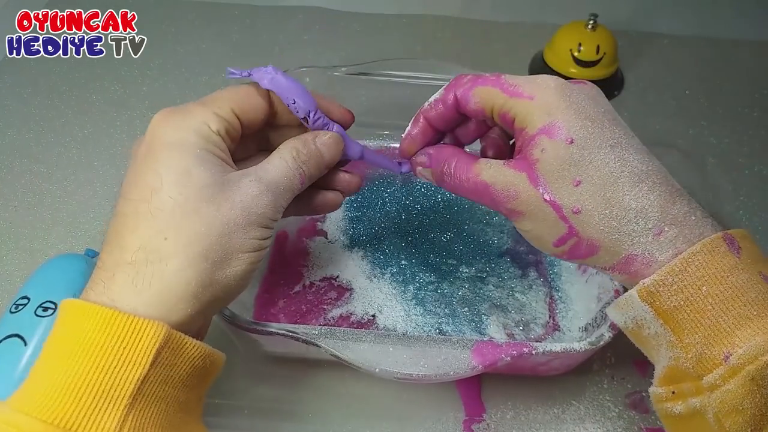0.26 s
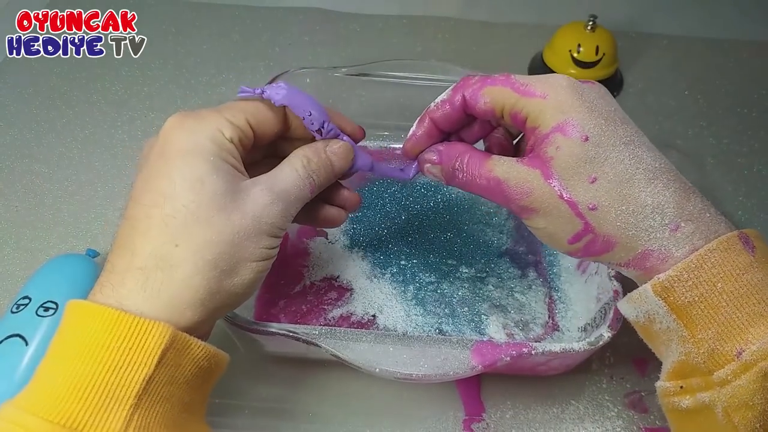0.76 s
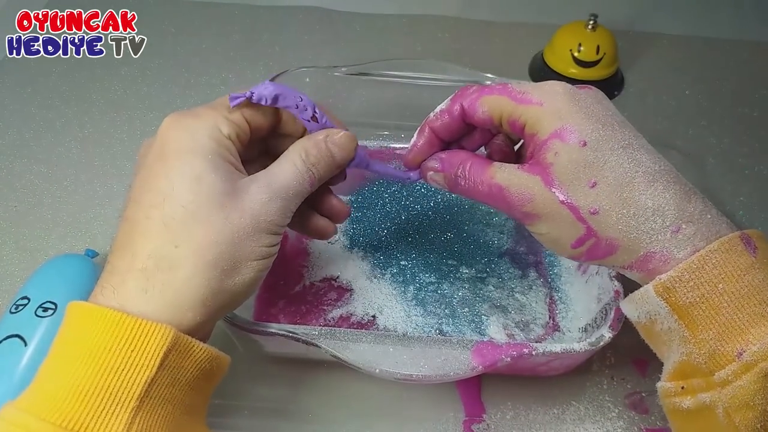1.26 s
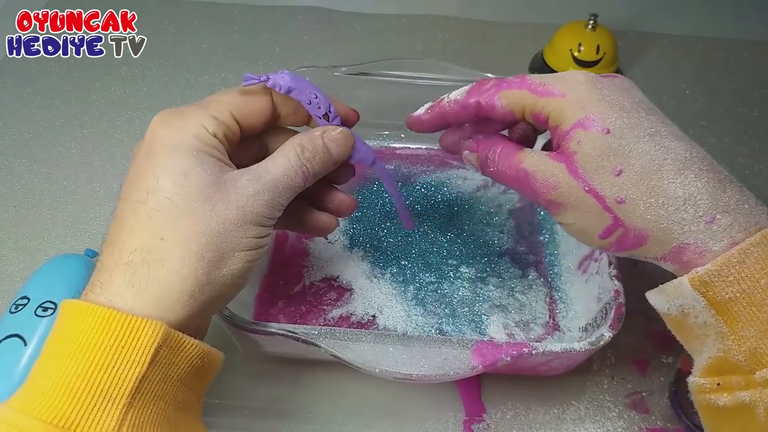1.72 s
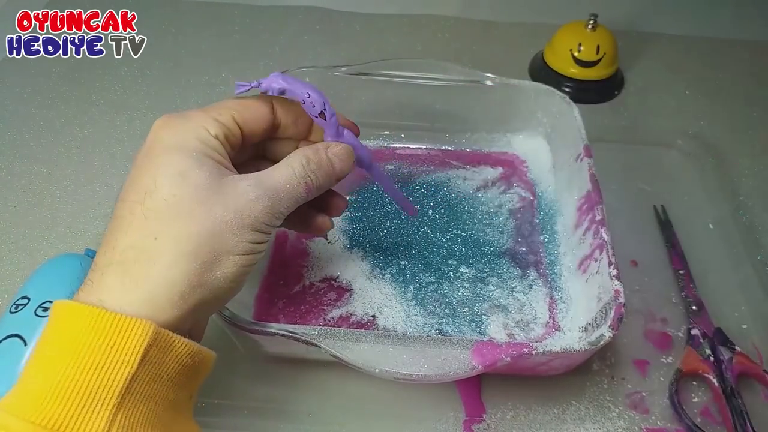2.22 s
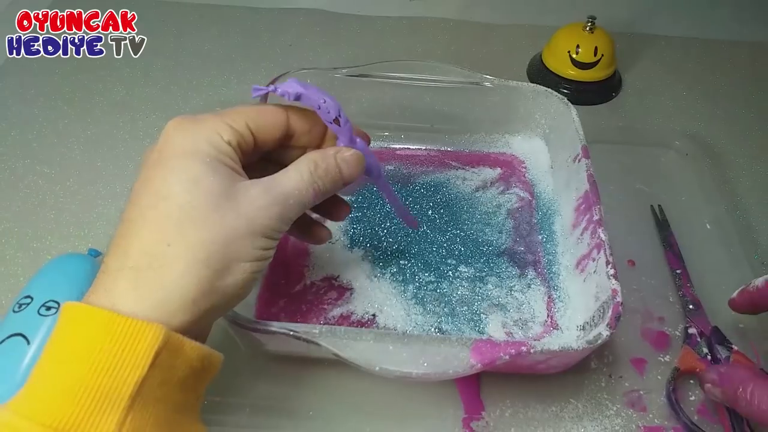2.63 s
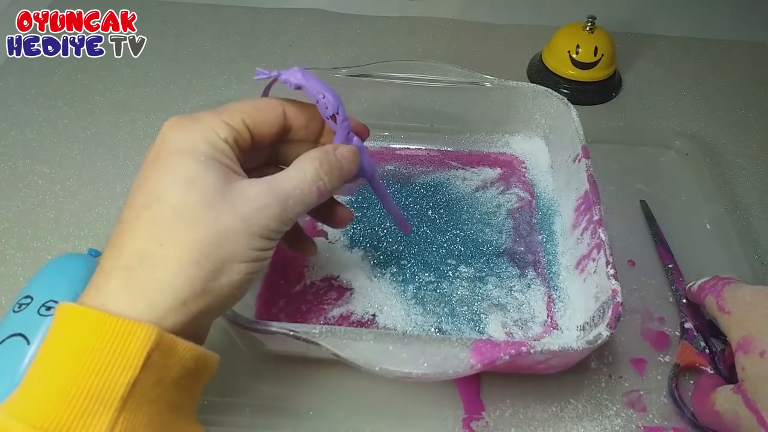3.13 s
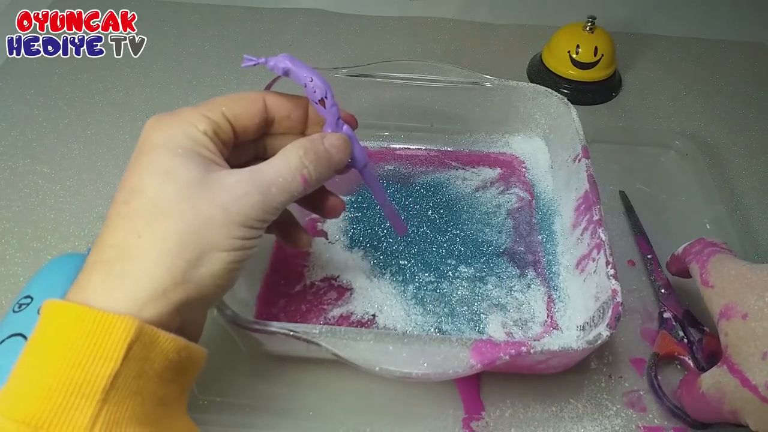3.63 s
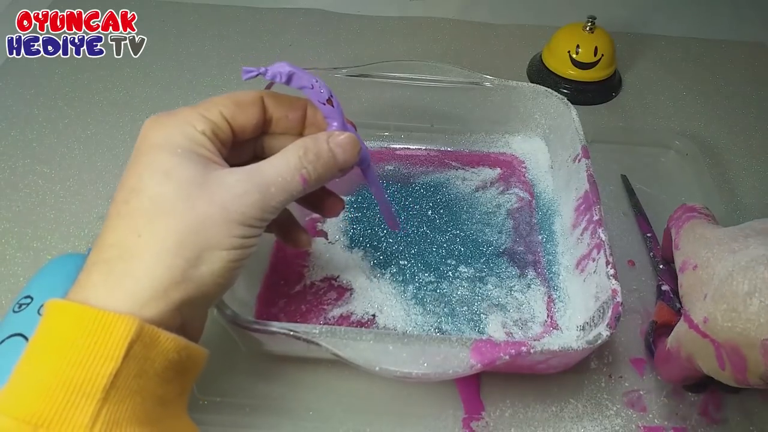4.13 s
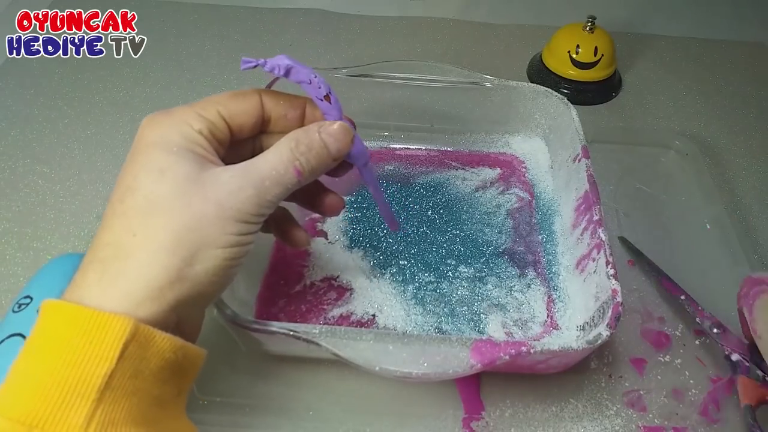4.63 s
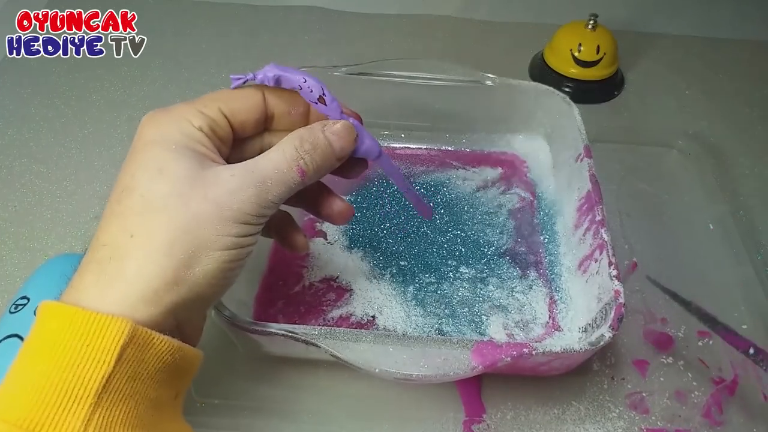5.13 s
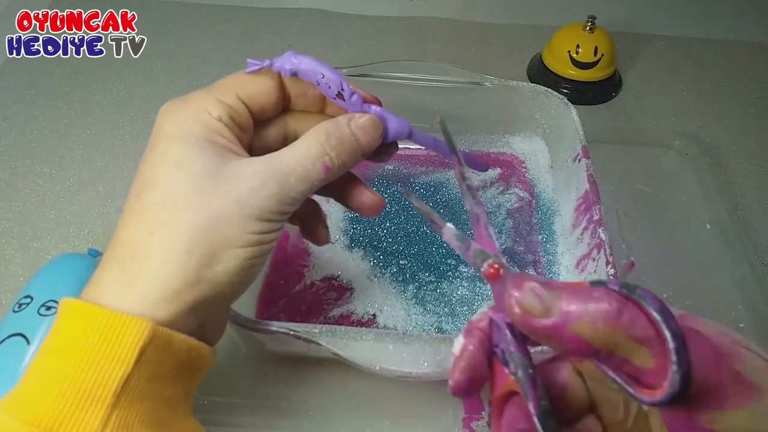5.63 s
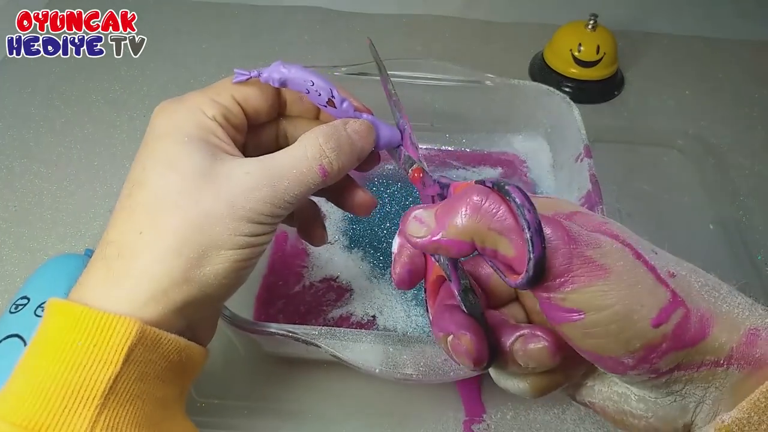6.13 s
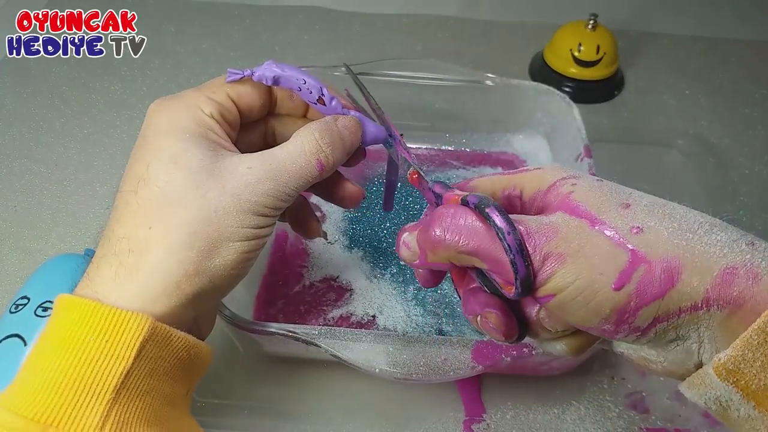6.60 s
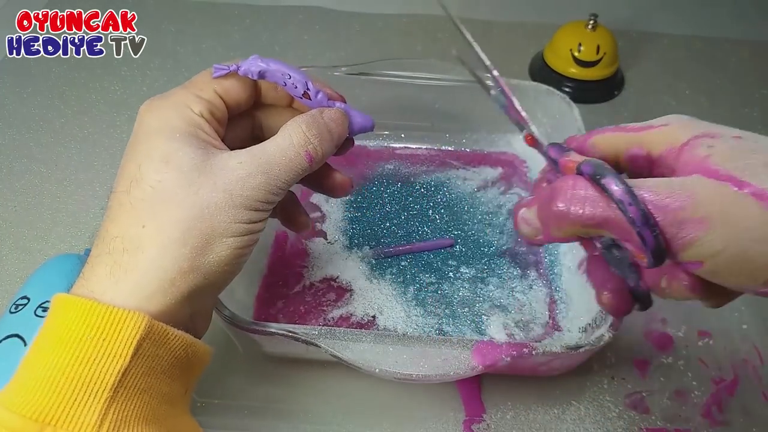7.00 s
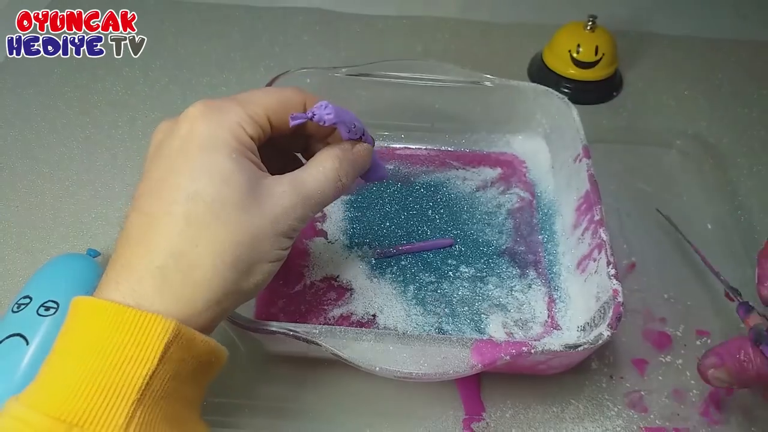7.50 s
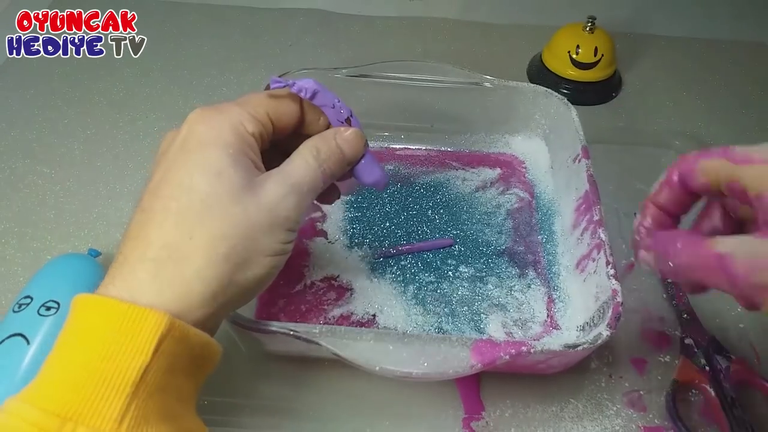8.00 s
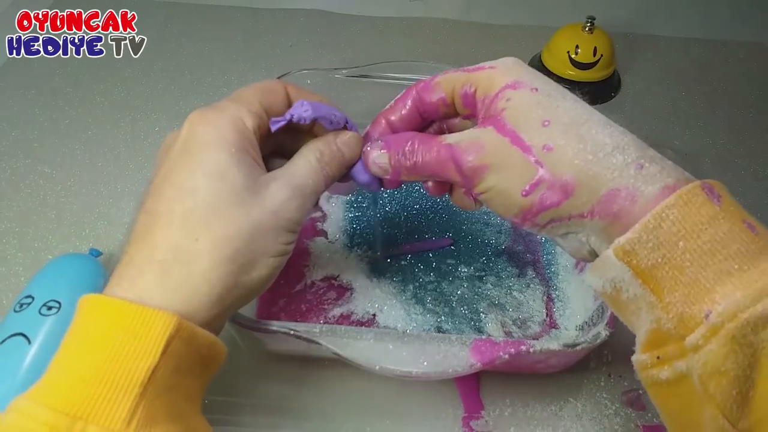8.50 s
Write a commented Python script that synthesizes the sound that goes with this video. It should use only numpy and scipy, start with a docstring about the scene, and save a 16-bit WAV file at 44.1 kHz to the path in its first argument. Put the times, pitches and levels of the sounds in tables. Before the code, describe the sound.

Sticky fingers softly swish along a small rubber balloon, scissors knock and scrape on a table, snip with a thin squeak, then clatter down.

```python
"""Balloon neck snipped with scissors

Sticky fingers swish along a small filled balloon's neck (dense coloured slips) and peel off in bright snaps.
Scissors are fumbled at a table: knocks ring modes of table and surface, scrapes drive them with slips.
The blades shear the neck in jerks, break through with a rising squeak, and are put down with a clatter.
A small room answers; room tone, microphone hiss and a trace of whine run throughout."""
import sys
import numpy as np
from scipy import signal
from scipy.fft import rfft, irfft
from scipy.io import wavfile

SR = 44100
rng = np.random.default_rng(int(sys.argv[2]) if len(sys.argv) > 2 else 0)


def transcribe(u):
    """Save the signal u as a 16-bit wav file named by the first command-line argument.

    u: samples, shape (n,) or (channels, n), limited to [-1, 1]; the rate is SR.
    q: integer samples, one column per channel.
    """
    v = np.clip(np.atleast_2d(u).T, -1, 1)
    q = np.round(v * 32767).astype(np.int16)
    wavfile.write(sys.argv[1], SR, q)


N = 385875

TIME = np.arange(N) / SR
RING = TIME[:SR * 2 // 5]   # time axis of a ringing blow
SHORT = TIME[:SR // 25]   # time axis of a crack

# Modes of the struck surface. Each row: frequency in Hz, level in dB, t60 in s.
SURFACE_MODES = [(708.7, -15, 0.036), (964, -5, 0.027), (997, -7, .016), (1082, 10, .016),
                 (1204, -8, 0.037), (1580, -2, 0.03), (1797, 1.5, .012), (2050, -14, 0.031),
                 (1017, -29, .15), (1094, -31.5, .15)]
# Lower colour of the contact noise. Each row: frequency in Hz, density in dB per Hz.
CLACK_COLOUR = [(1500, -15), (2050, -3.5), (2450, -3.5), (2800, -5.5), (3400, -2.5), (3950, -4),
                (4400, -5.5), (5300, -10), (6000, -17), (7500, -38.5)]
# Upper colour of the contact noise. Each row: frequency in Hz, density in dB per Hz.
TICK_COLOUR = [(4200, -15.5), (5400, -1), (6400, -3.5), (7300, -1.5), (8000, -0.5), (9000, -17.5),
               (10700, -12), (13000, -14), (16000, -11.5)]


def from_db(db):
    """Decibels to gain."""
    return 10 ** (np.asarray(db) / 20)


def unit_energy(x):
    """Scale so that the squares sum to one."""
    return x / np.sqrt(np.sum(x ** 2) + 1e-20)


def decay(t60, t):
    """Exponential fall of 60 dB in t60 seconds, floored at exp(-20)."""
    return np.exp(-np.minimum(np.log(1000) * t / t60, 20))


def add(out, s, sound):
    """Mix a sound in at s seconds."""
    start = max(round(s * SR), 0)
    out[start:start + len(sound)] += sound[:N - start]


def coloured(x, spectrum, size=4096):
    """Causal minimum-phase filter with the given spectrum, built by folding the cepstrum."""
    hz, db = np.transpose(spectrum)
    grid_hz = np.linspace(1, SR / 2, size // 2 + 1)
    log_gain = np.log(from_db(np.interp(np.log(grid_hz), np.log(hz), db)))
    cepstrum = irfft(log_gain)[:size // 2]
    cepstrum[1:] *= 2
    impulse = irfft(np.exp(rfft(cepstrum, size)))
    return signal.oaconvolve(x, impulse)[:len(x)]


def steady(x, spectrum):
    """Full-length coloured noise of rms one."""
    return unit_energy(coloured(x, spectrum)) * np.sqrt(N)


def slips(count, per_s, spread_db):
    """Tiny stick-slip releases at random moments, a few much larger than the rest."""
    sizes = from_db(spread_db * np.minimum(rng.exponential(1, count), 4))
    return unit_energy(sizes * rng.standard_normal(count) * (rng.random(count) < per_s / SR))


def struck(modes, vary_db, detune, rise_s):
    """Modes swell and ring from one blow; strength and pitch vary with where it lands."""
    ring = np.zeros(len(RING))
    varied = rng.standard_normal((len(modes), 2))
    for (hz, db, t60), (stronger, higher) in zip(modes, varied):
        t = RING[:int(2 * t60 * SR)]
        tone = np.sin(2 * np.pi * hz * (1 + detune * higher) * t)
        ring[:len(t)] += from_db(db + vary_db * stronger) * tone * decay(t60, t)
    return unit_energy(ring * (1 - np.exp(-RING / rise_s)) ** 2)


def crack(spectrum, t60, rise_s, corner_hz):
    """Dense cloud of short-lived high modes; a soft contact drives those above its corner weakly."""
    cloud = rng.standard_normal(len(SHORT)) * decay(t60, SHORT) * (1 - np.exp(-SHORT / rise_s))
    softened = [(hz, db - 10 * np.log10(1 + (hz / corner_hz) ** 4)) for hz, db in spectrum]
    return np.pad(unit_energy(coloured(cloud, softened, size=512)), (0, len(RING) - len(SHORT)))


def room(x, wet_db):
    """Add dense near echoes and a diffuse tail of noise bands, the bass lasting longest."""
    # Edges of the adjoining bands in Hz.
    edges_hz = [45, 100, 200, 400, 800, 1600, 3200, 6400, 18000]
    # One value a band: level in dB against the other bands.
    bands_db = [-6, 0, -2.5, -1.5, -8, -4, -7, -6.5]
    # One value a band: t60 in s.
    bands_t60_s = [.45, .4, .33, .28, .25, .22, .21, .19]
    build_up_s, early_gain, early_t60_s = 0.0045, 1.6, 0.04
    shape = (1 - np.exp(-RING / build_up_s)) ** 2 * (1 + early_gain * decay(early_t60_s, RING))
    white = rng.standard_normal((2, len(RING)))
    tail = np.zeros(len(RING))
    for k, (db, t60) in enumerate(zip(bands_db, bands_t60_s)):
        low_hz, high_hz = edges_hz[k], edges_hz[k + 1]
        t = RING[:int(t60 * SR)]
        band_pass = signal.butter(2, (low_hz, high_hz), "band", fs=SR, output="sos")
        band = signal.sosfilt(band_pass, white[k % 2, :len(t)]) * shape[:len(t)] * decay(t60, t)
        tail[:len(t)] += from_db(db) * np.sqrt(2 * (high_hz - low_hz) / SR) * unit_energy(band)
    return x + from_db(wet_db) * signal.fftconvolve(x, tail)[:len(x)]


def swells(rows):
    """Gain of a run of hand strokes, each a bell-shaped rise and fall."""
    edge_db = 17   # fall from the peak at half a length either side
    gain = np.zeros(N)
    for s, length, db in rows:
        near = np.abs(TIME - s) < length
        gain[near] += from_db(db - edge_db * (2 * (TIME[near] - s) / length) ** 2)
    return gain


def background():
    """Low room tone, even microphone hiss and a faint electrical whine of fixed sines."""
    # Room tone. Each row: frequency in Hz, density in dB per Hz.
    hum_colour = [(15, -38), (25, -6.5), (115, 0), (250, -13.5), (359, -12.5), (447, -16), (1150, -18),
                  (1370, -18.5), (1640, -13), (1850, -16), (3000, -19), (3900, -52), (6600, -120)]
    # Microphone hiss. Each row: frequency in Hz, density in dB per Hz.
    hiss_colour = [(1760, -33.5), (3000, -11), (4110, -5), (4570, -15), (4660, -5), (5140, -1.5),
                   (5750, -9.5), (7150, -10.5), (7780, -8.5), (8280, -18.5), (9460, -21), (11100, -17.5),
                   (13200, -7), (16000, -20.5)]
    # Whine. Each row: frequency in Hz, rms level in dB.
    whine_tones = [(2286, -88), (12850, -86), (13300, -86)]
    hum_db, hiss_db = -72.5, -70
    hum = from_db(hum_db) * steady(rng.standard_normal(N), hum_colour)
    whine = sum(from_db(db) * np.sqrt(2) * np.sin(2 * np.pi * hz * TIME) for hz, db in whine_tones)
    hiss = from_db(hiss_db) * steady(rng.standard_normal(N), hiss_colour)
    return hum + hiss + whine


def rubber():
    """Fingers slide along stretched rubber; dense slips merge into a fine-grained swish."""
    # One swell a stroke. Each row: peak time in s, length in s, peak level in dB.
    strokes = [(.19, 0.29, -68.5), (.48, .34, -62), (.82, .26, -61), (1.11, 0.26, -59.5),
               (1.39, 0.18, -61.5), (1.6, 0.23, -65), (5.46, 0.39, -63.5), (6.11, 0.067, -68.5),
               (6.66, 0.072, -56), (6.765, 0.046, -65), (6.87, .08, -70), (8.33, 0.58, -66),
               (8.57, 0.19, -68), (8.75, 0.078, -65)]
    # Each row: frequency in Hz, density in dB per Hz.
    rubber_colour = [(1470, -39), (2500, -21), (3130, -31), (3440, -6), (4370, 1.5), (5610, -6.5),
                     (6450, -1.5), (7020, -3.5), (7950, 0), (9220, -12.5), (12900, -3.5), (15200, -6),
                     (16000, -28)]
    return swells(strokes) * steady(slips(N, per_s=14000, spread_db=1.0), rubber_colour)


def snap(db):
    """A sticky contact parts in a bright tick and a dying spray of smaller ones."""
    # Each row: frequency in Hz, density in dB per Hz.
    peel_colour = [(4500, -24), (6200, 4), (7900, 4), (9200, -8), (11000, 5), (13000, 3.5), (16000, 7.5)]
    clack_db = -13.5   # low part against the tick
    spray = 3.6 * unit_energy(rng.standard_normal(len(SHORT)) * decay(0.022, SHORT))
    spray[0] += 1
    tick = unit_energy(coloured(spray, peel_colour, size=512))
    clack = unit_energy(coloured(spray, CLACK_COLOUR, size=512))
    return from_db(db) * (tick + from_db(clack_db) * clack)


def crackles(count=2):
    """Each patch of tacky skin lets go in one clear snap with a few weaker ones around it."""
    # Skin and rubber letting go. Each row: start in s, level in dB.
    releases = [(1.5625, -40), (1.5897, -33), (5.355, -30), (5.3832, -24), (5.409, -29), (5.4358, -20),
                (5.449, -22), (5.4739, -23.5), (6.3431, -35), (6.3626, -34), (6.6596, -27), (6.6789, -33),
                (6.8572, -30), (7.2713, -32.5), (7.29, -21), (7.304, -22), (8.126, -37)]
    scatter_s, scatter_loss_db = 0.0198, 9   # greatest offset and fixed loss of the weaker snaps
    out = np.zeros(N)
    for s, db in releases:
        add(out, s, snap(db))
        for offset_s in rng.uniform(-scatter_s, scatter_s, count):
            add(out, s + offset_s, snap(db - scatter_loss_db))
    return out


def brushes():
    """The hand gropes for the scissors, skin sliding softly over the table top as smooth noise."""
    # Each row: peak time in s, length in s, peak level in dB.
    strokes = [(3.1, 1.3, -70), (4.5, 0.64, -61)]
    # Each row: frequency in Hz, density in dB per Hz.
    table_colour = [(2500, -7), (3600, -6), (5000, 2), (6200, -7), (7800, -9), (9000, -25.5),
                    (16000, -16.5)]
    return swells(strokes) * steady(rng.standard_normal(N), table_colour)


def blow(db, weight_db, clack_db, corner_hz):
    """One blow wakes a deep boom, rings the table and its surface and clacks the scissors; light touches start
    softly."""
    # Deep low ring that each blow sets off. Each row: frequency in Hz, level in dB, t60 in s.
    thud_modes = [(73, -5.5, 0.22), (99, -5, 0.1), (114, 6.5, 0.24), (149, -11, 0.0612)]
    # Bending of the table top. Each row: frequency in Hz, level in dB, t60 in s.
    body_modes = [(200.2, -7.5, .11), (225, -6, .13), (288, 1.5, 0.063), (355, 1.5, 0.1),
                  (421.4, 2.5, 0.055), (480, 3, .07)]
    thud_db, thud_follows = -14, 0.8   # deep ring of a 0 dB blow; its share of the swing in strength
    body_db = -8.5   # against the strength
    hard_hz, tick_db_per_octave = 10800, 14   # tick equals clack at this corner, fades below it
    rise_s = np.interp(db + max(clack_db, 0), [-30, -5], [.004, .0002])
    tick_db = clack_db + tick_db_per_octave * np.log2(corner_hz / hard_hz)
    thud = struck(thud_modes, vary_db=3.5, detune=.012, rise_s=0.0078)
    body = struck(body_modes, vary_db=1.5, detune=0.028, rise_s=0.0032)
    surface = struck(SURFACE_MODES, vary_db=1.7, detune=0.038, rise_s=.0004)
    clack = crack(CLACK_COLOUR, t60=.023, rise_s=rise_s, corner_hz=corner_hz)
    tick = crack(TICK_COLOUR, t60=0.011, rise_s=rise_s, corner_hz=corner_hz)
    out = from_db(thud_db + thud_follows * db + weight_db) * thud
    out += from_db(db + body_db + weight_db) * body
    out += from_db(db) * surface
    out += from_db(db + clack_db) * clack
    out += from_db(db + tick_db) * tick
    return out


def knocks():
    """Scissors land on the table and rebound once, more weakly, later after a stronger blow."""
    # Each row: start in s, strength in dB, weight on the table in dB,
    # clack against the strength in dB, contact corner in Hz.
    landings = [(2.5983, -25, -3, -7.5, 5500), (2.7274, -28, -13, 3.5, 2000),
                (2.9233, -26.5, 3.5, -20, 7000), (2.9516, -25, -2, -18, 7040),
                (2.966, -16.5, -0.5, -23, 7000), (3.0343, -26, 7, -15, 7000),
                (3.2015, -23, -0.5, 1.5, 5500), (3.3978, -31.5, -21, -0.5, 9900),
                (3.6631, -20.5, -2.5, -22, 9000), (4.0222, -19, -4.5, -21.5, 9000),
                (4.4217, -14, 0.5, -5, 2980), (4.4633, -23.5, 5.5, -23, 9000),
                (4.585, -21.5, -0.5, -2.5, 11100), (4.6522, -40, 0, 5.5, 14200),
                (4.695, -30.5, -8.5, -4, 11040), (4.785, -27.5, 3.5, -11.5, 8000),
                (4.8699, -7, 0.5, -16, 7995), (4.874, -2.5, -1.5, -9, 4160), (4.9669, -11, -9.5, 1.5, 6540),
                (4.9702, -17, 9, -2, 12500), (4.986, 5, 2, -2, 5600), (5.0454, -34, 12, -8, 10000),
                (7.5696, -2.5, 0, -8, 10700), (7.6467, -3.5, -7, -14.5, 4800),
                (7.7656, -26, 0, -15.5, 9000), (7.7855, -14, -13, -14, 7900),
                (7.7971, -18.5, -10, -17, 9000), (7.8092, 6.5, -9, -11.5, 7400),
                (7.8844, -7.5, -7.5, -8, 7000), (7.9393, 7.5, -1, -5, 9800)]
    rebound_s, rebound_doubles_db = .02, 34.5   # mean gap at 0 dB strength; rise that doubles it
    rebound_loss_db = 15
    out = np.zeros(N)
    for s, db, *contact in landings:
        gap_s = rebound_s * 2 ** (db / rebound_doubles_db) * rng.uniform(.85, 1.15)
        rebound = blow(db - rebound_loss_db, *contact)
        rebound = np.pad(rebound, (round(gap_s * SR), 0))[:len(RING)]
        add(out, s, room(blow(db, *contact) + rebound, wet_db=0.2))
    return out


def scrapes(count=2):
    """Dragged scissors send swells of tiny slips from a few contact points into the surface modes."""
    # Each row: start in s, length in s, strength in dB, brightness in dB.
    drags = [(3.072, .03, -31, 5.5), (3.161, 0.048, -23.5, -1.5), (3.366, 0.042, -27, 12.5),
             (3.505, 0.056, -34, 4.5), (3.604, 0.012, -26.5, 2), (3.931, 0.042, -28.5, 0.5),
             (4.463, .026, -17, -6), (4.899, .092, -14.5, 1), (5.066, 0.039, -31, 16),
             (7.76, 0.043, -23, -1)]
    clack_db, tick_db = -7, -11.5   # against the strength, before brightness
    out = np.zeros(N)
    t = TIME[:SR // 10]
    for s, length, db, bright_db in drags:
        swell = np.sqrt(np.sin(np.pi * np.minimum(t / length, 1)).clip(0))
        for _ in range(count):
            drive = unit_energy(slips(len(t), per_s=1500, spread_db=4.0) * swell)
            body = struck(SURFACE_MODES, vary_db=7.0, detune=0.14, rise_s=.0006)
            clack = crack(CLACK_COLOUR, t60=0.0064, rise_s=.0003, corner_hz=4670)
            tick = crack(TICK_COLOUR, t60=.005, rise_s=0.00018, corner_hz=10560)
            body += from_db(bright_db + clack_db) * clack
            body += from_db(bright_db + tick_db) * tick
            add(out, s, from_db(db) * signal.fftconvolve(drive, body[:len(t)]) / np.sqrt(count))
    return room(out, wet_db=2.0)


def snip():
    """Blades bite, shear the neck in small jerks, break through and run out in a thin, wavering squeak."""
    # Each row: frequency in Hz, density in dB per Hz.
    blade_colour = [(1470, -63.5), (2500, -34), (3180, -18), (3550, -6), (4620, 1), (6920, -9), (7360, -5),
                    (7590, -12.5), (8020, -8), (8460, -13), (8940, -16.5), (11700, 2), (16000, -13)]
    start_s, attack_s, shear_db = 6.262, 0.048, -55
    break_s, break_boost, break_t60_s, run_out_t60_s = 6.359, 1.45, 0.1, 0.36
    # Squeak from the break on: a short chirp over a faint tone, rising in pitch as the blades close.
    squeak_hz, rise_hz_per_s, squeak_length_s = 7760, 8500, 0.1
    chirp_db, chirp_rise_s, chirp_t60_s, tone_db = -38, 0.0045, .04, -65   # levels before the fades
    since = np.maximum(TIME - break_s, 0)
    force = np.clip((TIME - start_s) / attack_s, 0, 1) * decay(run_out_t60_s, since)
    force *= 1 + break_boost * (TIME > break_s) * decay(break_t60_s, since)
    jerks = from_db(3.2 * steady(rng.standard_normal(N), [(150, 0), (600, -40)]))
    grind = steady(slips(N, per_s=3000, spread_db=2.0), blade_colour)
    shear = from_db(shear_db) * force * jerks * grind
    waver = steady(rng.standard_normal(N), [(300, 3.0), (1500, -34.5)])
    pitch_hz = squeak_hz + rise_hz_per_s * np.minimum(since, squeak_length_s)
    pitch_hz *= 1 + 0.012 * waver
    level = from_db(chirp_db) * decay(chirp_t60_s, since) + from_db(tone_db)
    level *= np.minimum(since / chirp_rise_s, 1) ** 2
    level *= np.sqrt(np.maximum(1 - since / squeak_length_s, 0))
    return shear + level * np.sin(2 * np.pi * np.cumsum(pitch_hz) / SR)


def scene():
    """Scissors on the table, rubber and skin between the hands, and the quiet room."""
    hands = room(rubber() + snip() + crackles(), wet_db=-1.5)
    return (knocks() + scrapes() + brushes() + hands + background())[None]


def record(dry):
    """The microphone loses the deep bass; the top is cut steeply."""
    low_cut_hz, high_cut_hz = 45, 15950
    thin = signal.sosfilt(signal.butter(3, low_cut_hz, "high", fs=SR, output="sos"), dry)
    return signal.sosfilt(signal.ellip(12, .1, 80, high_cut_hz, fs=SR, output="sos"), thin)


dry = scene()
out = record(dry)
transcribe(out)
```